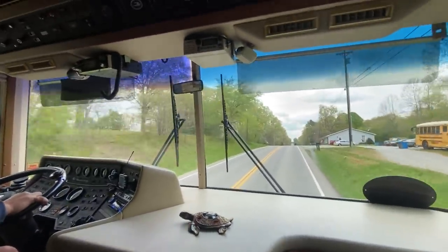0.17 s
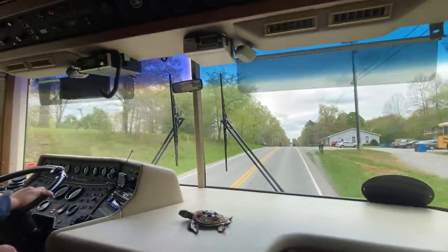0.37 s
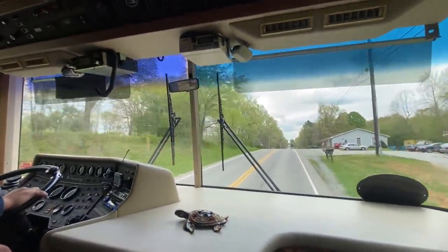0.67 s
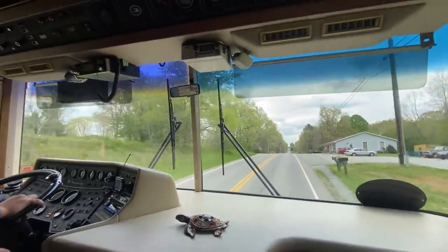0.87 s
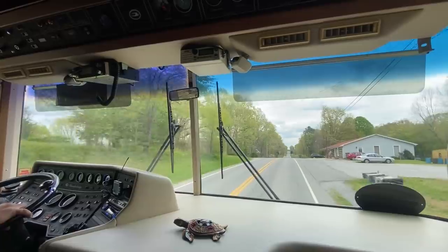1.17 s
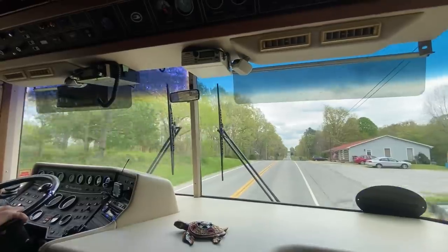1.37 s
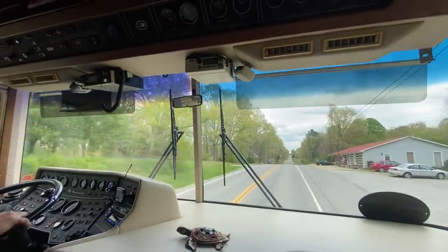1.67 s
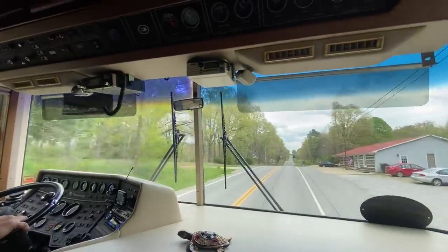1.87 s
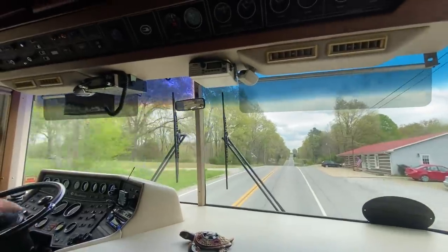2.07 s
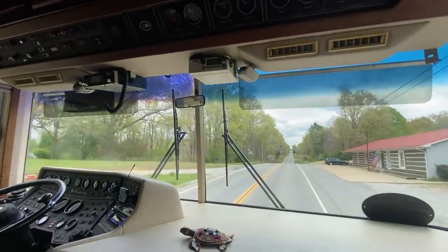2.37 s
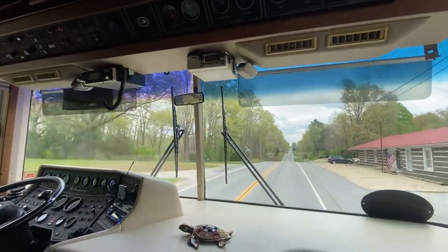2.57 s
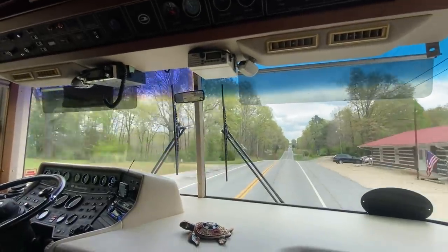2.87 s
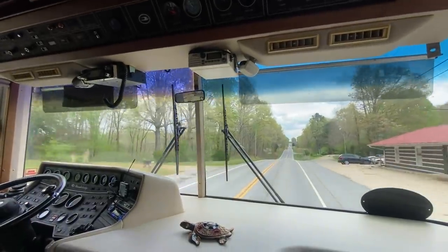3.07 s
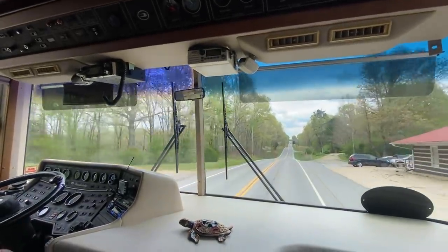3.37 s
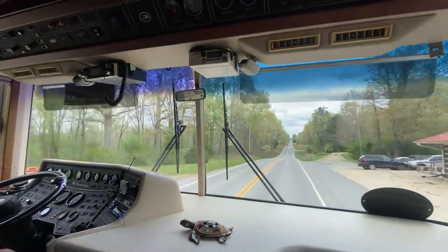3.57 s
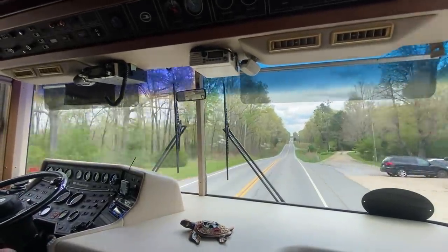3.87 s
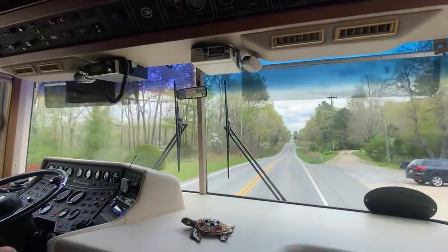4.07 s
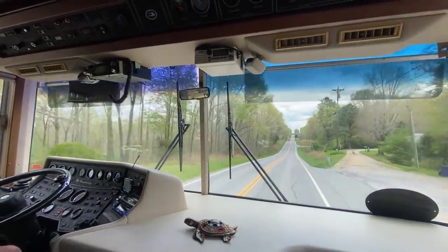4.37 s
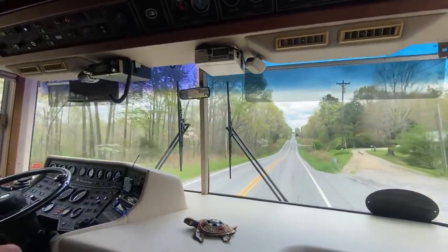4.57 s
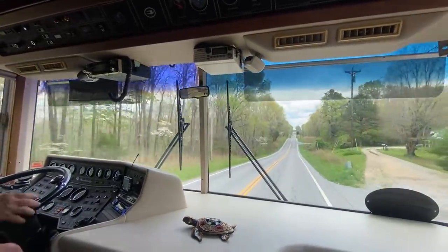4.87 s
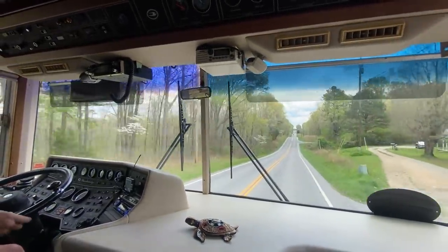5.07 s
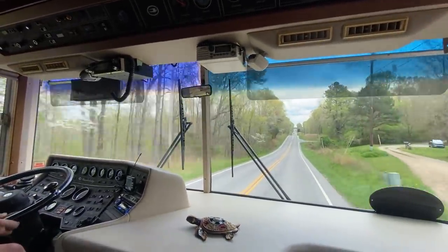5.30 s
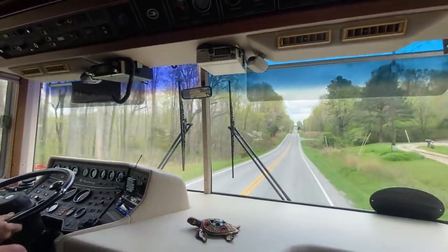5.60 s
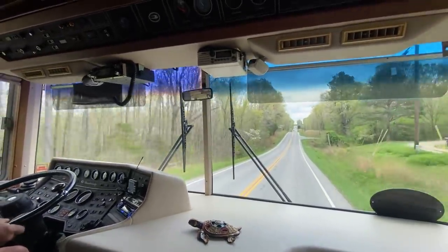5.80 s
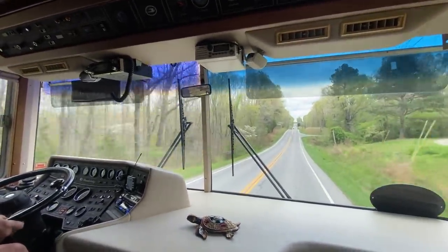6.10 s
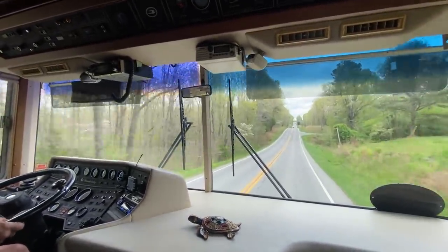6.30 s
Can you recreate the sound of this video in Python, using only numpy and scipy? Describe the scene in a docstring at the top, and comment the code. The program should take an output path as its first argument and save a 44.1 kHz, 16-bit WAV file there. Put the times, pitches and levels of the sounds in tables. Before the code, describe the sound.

Low engine hum, booming cabin air, tyre roar and soft wind heard from a bus dashboard, with plastic chatter and one rough-patch knock.

```python
"""Country road, from a diesel bus cab

Heard at the dashboard: a far-off engine drones at its firing rate, a sine locked to the crankshaft, with
weaker tones around it. A wandering sine is the cabin boom, swelled by jolts; shaped noise gives panel
rumble, tyre roar and wind. Close by, loose trim chatters in noise bursts, fittings tick as struck
resonances, plastic squeaks as short tones, and a rough patch knocks on the floor.
The microphone loses the deepest rumble and the recorder cuts the top."""
import sys
import numpy as np
from scipy import signal
from scipy.fft import rfft, irfft
from scipy.io import wavfile

SR = 44100
rng = np.random.default_rng(int(sys.argv[2]) if len(sys.argv) > 2 else 0)


def wav_record(signal):
    """Record a signal, one row per channel, as 16-bit PCM in the file named by sys.argv[1]."""
    frames = np.transpose(np.atleast_2d(signal))
    bounded = np.clip(frames, -1, 1)
    # unit amplitude maps onto the largest positive 16-bit level
    quanta = np.round(bounded * 32767).astype(np.int16)
    wavfile.write(sys.argv[1], SR, quanta)


N = 284004
TIME = np.arange(N) / SR

# Levels in the tables are relative: each source function sets its own final balance.
# crankshaft speed sags and recovers: time_s, turns_per_second_hz
CRANK_SPEED = [(0.0, 28.72), (1.8, 27.6), (2.5, 27.33), (3.6, 27.19), (4.5, 27.3), (5.5, 27.6),
               (6.44, 28.13)]
# engine load, as the level of the firing tone: time_s, level_db
ENGINE_LOAD = [(0.0, -29), (0.45, -28), (0.7, -22), (1.1, -20), (2.2, -21.5), (3.35, -24.5), (3.54, -29),
               (3.72, -19), (3.98, -26), (4.13, -24), (4.4, -27), (5.1, -22.5), (5.3, -28), (5.62, -27.5),
               (5.75, -28), (6.44, -21.5)]
# weaker engine tones: multiple_of_crank_speed, level_db
ENGINE_ORDERS = [(3, -31.5), (5, -35.5), (6, -41), (7, -45.5), (8, -44.5), (13, -48.5), (20, -53.5)]
# a higher engine tone swells and fades: time_s, level_db
HUM_LEVEL = [(0.0, -52), (0.6, -48), (0.72, -34.5), (1.35, -41.5), (1.51, -28.5), (1.63, -49),
             (1.98, -31.5), (2.3, -42), (2.65, -36), (2.8, -35.5), (3.1, -38.5), (3.6, -37.5), (4.1, -41.5),
             (4.9, -35), (5.55, -34), (6.44, -37)]
# whir of a belt-driven accessory: harmonic_number, level_db
ACCESSORY_HARMONICS = [(1, -44), (2, -57), (3, -55)]
# wandering pitch of the cabin boom: time_s, pitch_hz
BOOM_PITCH_PATH = [(0.0, 69.1), (.35, 64.5), (.8, 72.2), (1.3, 72.5), (1.8, 71.1), (2.1, 82), (2.33, 72),
                   (2.55, 72), (3.0, 67.5), (3.35, 69.3), (4.0, 66.3), (4.6, 66.25), (5.0, 73.2), (5.3, 66),
                   (5.6, 69.3), (6.0, 70.4), (6.3, 78.2), (6.44, 73)]
# the body jolts on uneven road: start_s, length_s, cabin_boom_db, panel_rumble_db
ROAD_JOLTS = [(0.0, 0.033, -29, -24), (0.144, 0.15, -26, -27), (.48, 0.68, -39, -32),
              (1.007, 0.086, -24, -49), (1.178, 0.18, -22.5, -48), (1.577, 0.086, -19.5, -42),
              (1.748, 0.14, -25, -30), (1.971, 0.22, -24.5, -34), (2.346, 0.18, -18, -33),
              (2.687, 0.16, -23, -42), (2.951, 0.12, -17, -33), (3.25, 0.14, -20, -26.5),
              (3.788, 0.047, -21, -24), (3.93, 0.19, -27, -38), (4.301, 0.084, -26.5, -28),
              (4.603, 0.11, -20.5, -27), (4.899, 0.066, -21, -34), (5.159, 0.11, -33, -28),
              (5.515, 0.075, -15, -33), (5.662, 0.12, -28, -21.5), (6.07, 0.06, -18.5, -36),
              (6.191, 0.26, -22.5, -25.5)]
# spectrum of the rumbling panels: frequency_hz, level_db
PANEL_SPECTRUM = [(24, -34), (30, -22), (42, -2.5), (55, 4), (92, 5), (125, 6), (150, -1), (180, 1.5),
                  (215, 1.5), (250, -3), (290, -5.5), (360, -14.5), (600, -34.5)]
# spectrum of the tyre roar: frequency_hz, level_db
TYRE_SPECTRUM = [(150, -32), (240, 0), (310, 4), (400, -1.5), (510, -2.5), (590, -7.5), (750, -9.5),
                 (1000, -12), (1500, -19), (3000, -29)]
# soft, dull knocks as the wheels cross a rough patch: start_s, level_db, brightness_hz
ROAD_KNOCKS = [(0.6, -14, 1200), (1.222, -13, 2500), (4.617, -7, 1397), (4.645, -16, 1802),
               (4.677, -7, 1403), (4.704, 5, 170), (5.383, -14, 2000), (5.493, -16, 2000),
               (6.213, -23, 2010)]
# resonances of the floor: frequency_hz, width_hz, level_db
FLOOR_MODES = [(141, 80, 6), (333, 280, 3), (465, 140, -4), (840, 240, -3.5), (1210, 440, -5.5),
               (1780, 1100, -10)]
# bursts of chatter from loose trim: start_s, level_db, length_s
TRIM_CHATTERS = [(.123, -44, 0.01), (.158, -46, 0.0036), (.184, -44, .005), (.194, -46, .005),
                 (.214, -45, .004), (.226, -48, .005), (.235, -46, .005), (.254, -44, .002),
                 (.261, -43, .002), (.271, -46, .011), (.294, -44, .007), (.378, -44, 0.0089),
                 (.396, -51, .002), (.581, -46, .018), (.608, -43.5, .008), (.638, -46, 0.02),
                 (.731, -45, .010), (1.087, -45, .005), (1.225, -42, 0.015), (1.342, -40.5, 0.014),
                 (1.362, -45, 0.0051), (1.610, -46, 0.0053), (1.656, -46, 0.014), (1.701, -45, .004),
                 (1.772, -48.5, .008), (1.802, -48, 0.0098), (1.874, -47, 0.011), (2.317, -48, .009),
                 (2.366, -46, .004), (2.378, -47, 0.0044), (2.389, -46, 0.0072), (2.522, -46, 0.0099),
                 (2.592, -46, .005), (2.684, -49, 0.013), (2.735, -51, 0.0092), (3.230, -44.5, 0.0027),
                 (3.597, -47.5, 0.0049), (3.618, -47.5, .004), (3.671, -45, 0.0038), (3.840, -44, 0.0094),
                 (3.856, -46, 0.0095), (3.888, -43, 0.0027), (3.908, -49, .003), (4.054, -49, .014),
                 (4.080, -44, 0.0031), (4.118, -49, 0.0039), (4.245, -40, 0.0029), (4.485, -46, 0.0039),
                 (4.494, -61, 0.0032), (4.582, -45, .003), (4.594, -45, .012), (4.610, -44, 0.0079),
                 (4.630, -45, 0.011), (4.653, -44, 0.023), (4.691, -47.5, 0.026), (4.728, -49.5, .028),
                 (4.856, -48, .011), (5.202, -48, 0.0093), (5.267, -44, 0.025), (5.370, -44.5, 0.029),
                 (5.411, -46, 0.0054), (5.436, -48, .008), (5.500, -47.5, 0.0051), (5.733, -44.5, .010),
                 (5.821, -46, 0.0076), (5.879, -45.5, .017), (5.914, -45, 0.0039), (6.205, -38, 0.0017),
                 (6.214, -46, .016), (6.261, -48, 0.0058), (6.272, -50, .004), (6.294, -47.5, .004),
                 (6.380, -47, .009)]
# spectrum of the trim contacts: frequency_hz, level_db
TRIM_SPECTRUM = [(800, -13), (2000, 8.5), (3500, 0.5), (5500, -2), (7200, 0), (9500, -3), (12000, -4),
                 (14200, -0.5), (15700, -6)]
# resonances of the loose trim: frequency_hz, width_hz, level_db
TRIM_RESONANCES = [(7100, 300, -8), (8330, 450, -8), (10000, 220, -1), (12400, 370, -13), (13600, 490, -7)]
# ticks of hard fittings: start_s, pitch_hz, level_db
FITTING_TICKS = [(0.775, 1720, -28), (1.285, 1295, -24), (2.37, 3000, -25), (2.519, 2850, -23),
                 (2.684, 1950, -23), (2.704, 2150, -24), (2.734, 2850, -24.5), (2.805, 2950, -21),
                 (2.881, 2886, -28), (3.468, 3000, -25), (3.623, 2846, -29), (4.725, 2880, -26),
                 (4.803, 2950, -25), (4.878, 3010, -25.5), (5.385, 1967, -25), (5.409, 1740, -24),
                 (5.487, 2900, -25.5), (5.68, 2100, -27), (6.216, 2800, -22.5), (6.27, 2400, -24),
                 (6.29, 2950, -22)]
# clinks of a small metal part: start_s, level_db
METAL_CLINKS = [(4.63, -22)]
# squeaks of rubbing trim: start_s, pitch_hz, level_db, length_s
TRIM_SQUEAKS = [(2.41, 5400, -50, .025), (2.49, 5440, -52, 0.045), (2.795, 5390, -49, 0.045),
                (3.17, 5380, -44, 0.049), (3.336, 5300, -41.5, 0.06), (4.21, 5380, -50, 0.039),
                (4.374, 5330, -46, 0.029), (5.452, 5300, -48, 0.029), (5.533, 5300, -46.5, .035),
                (6.222, 5415, -48, 0.047)]
# airflow along the body eases and builds: time_s, level_db
AIRFLOW_LEVEL = [(0.0, -37.5), (1.9, -41), (2.4, -38.5), (3.15, -42), (3.8, -40), (4.6, -39), (6.44, -38)]
# spectrum of the wind: frequency_hz, level_db
WIND_SPECTRUM = [(500, 1.5), (1100, -1.5), (1650, 2.5), (2500, 0), (3500, -0.5), (5000, -3.5), (6000, -10),
                 (7300, -19.5), (9500, -19), (11500, -17), (13700, -14), (15500, -21)]
# gaps and panels that ring in the airflow: frequency_hz, width_hz, level_db
GAP_MODES = [(1117, 21, 5), (1497, 42, -7), (1710, 60, -12), (2860, 36, -16), (3150, 69, -6),
             (3750, 390, -10), (7200, 250, -4), (10800, 170, -4), (12250, 130, -5), (13650, 200, -6),
             (14270, 120, -6)]

FIRINGS_PER_TURN, HUM_ORDER, ACCESSORY_RATIO = 4, 10, 7.567  # multiples of the crank speed
FIRING_THROB_DB, FIRING_WOBBLE_RAD = 1.2, .1
HUM_THROB_DB, HUM_WOBBLE_RAD = 3, .5
BOOM_WOBBLE_RAD, BOOM_WOBBLE_HZ = .35, 7
CRUISE_HZ = 27.5  # crank speed at which the road speed counts as 1
JOLT_ATTACK_S, JOLT_RELEASE_S = .022, .05
KNOCK_ATTACK_S, KNOCK_DECAY_S = .004, .012
CHATTER_ATTACK_S, CHATTER_TAIL_S = .0002, .0033
STIRS_PER_S, STIR_DB, STIR_SPREAD_DB, STIR_LENGTH_S = 15, -54, 3, .003  # faint, at random moments
TICK_DECAY_S, TICK_BOUNCE_DB = .009, 4
SQUEAK_SAG = .016  # fraction of its pitch that a squeak falls by
SQUEAK_JITTER, SQUEAK_JITTER_HZ = .014, 900  # fraction of the pitch, rate
TOP_HZ = 15650


def undb(db):
    """Decibels to gain."""
    return 10 ** (np.asarray(db) / 20)


def unit(x):
    """Scale to rms 1."""
    return x / np.sqrt(np.mean(x ** 2))


def curves(table):
    """Each column of a table, joined by straight lines in time."""
    s, *columns = np.transpose(table)
    return [np.interp(TIME, s, column) for column in columns]


def walk(rate_hz):
    """Smooth random wandering, rms 1, faster for a higher rate."""
    f = np.arange(N // 2 + 1) * SR / N
    spectrum = rfft(rng.standard_normal(N)) * np.exp(-(f / rate_hz) ** 2)
    return unit(irfft(spectrum, N))


def colour(x, points):
    """Shape a sound by a spectrum of (Hz, dB) points, falling away beyond both ends; rms 1."""
    hz, db = np.transpose(points)
    f = np.arange(N // 2 + 1) * SR / N + 1  # 1 Hz up, to keep the logarithm finite
    gain = undb(np.interp(np.log(f), np.log(hz), db))
    gain = gain / (1 + (hz[0] / 2 / f) ** 2) / (1 + (f / hz[-1] / 2) ** 2)
    return unit(irfft(rfft(x) * gain, N))


def ring(x, hz, width_hz):
    """One resonance, gain 1 at its centre."""
    return signal.lfilter(*signal.iirpeak(hz, hz / width_hz, fs=SR), x)


def add(track, s, sound):
    """Mix a sound in at a time."""
    start = max(int(s * SR), 0)
    part = sound[:max(N - start, 0)]
    track[start:start + len(part)] += part


def burst(length_s, attack_s, release_s):
    """An envelope that rises, holds until a length has passed and dies away."""
    t = TIME[:SR]
    return (1 - np.exp(-t / attack_s)) * np.exp(-np.maximum(t - length_s, 0) / release_s)


def blows(table, decay_s):
    """Rough contacts: noise that starts abruptly and dies away, one per (s, dB) row."""
    force, t = np.zeros(N), TIME[:SR // 4]
    for s, db in table:
        add(force, s, undb(db) * np.exp(-t / decay_s))
    return force * rng.standard_normal(N)


def engine(crank_hz, hum_db=-1.37, waver_db=2.0, wobble_rad=0.35):
    """The firing tone follows the load; unequal cylinders and an accessory add weaker, wavering tones."""
    angle = 2 * np.pi * np.cumsum(crank_hz) / SR
    firing_gain = undb(curves(ENGINE_LOAD)[0] + FIRING_THROB_DB * walk(6))
    firing = firing_gain * np.sin(FIRINGS_PER_TURN * angle + FIRING_WOBBLE_RAD * walk(5))
    hum_gain = undb(curves(HUM_LEVEL)[0] + hum_db + HUM_THROB_DB * walk(9.2))
    hum = hum_gain * np.sin(HUM_ORDER * angle + HUM_WOBBLE_RAD * walk(6.2))
    whir = [(harmonic * ACCESSORY_RATIO, db) for harmonic, db in ACCESSORY_HARMONICS]
    others = 0
    for order, db in list(ENGINE_ORDERS) + whir:
        phase = order * angle + wobble_rad * walk(3.5) + 2 * np.pi * rng.random()
        others = others + undb(db + waver_db * walk(0.96)) * np.sin(phase)
    return np.sqrt(2) * (firing + hum + others)


def jolts():
    """How hard the jolts drive the cabin air and the panels; each swells, holds and dies away."""
    boom, heave = np.zeros(N), np.zeros(N)
    for s, length_s, boom_db, rumble_db in ROAD_JOLTS:
        swell = burst(length_s, JOLT_ATTACK_S, JOLT_RELEASE_S)
        add(boom, s, undb(boom_db) * swell)
        add(heave, s, undb(rumble_db) * swell)
    return boom, heave


def cabin_boom(jolt, jolt_db=-1.5, steady_db=-33, waver_db=4.0):
    """The road keeps the cabin air booming on one wandering note; each jolt swells it."""
    hz, = curves(BOOM_PITCH_PATH)
    phase = 2 * np.pi * (np.cumsum(hz) / SR + rng.random())
    phase = phase + BOOM_WOBBLE_RAD * walk(BOOM_WOBBLE_HZ)
    steady = undb(steady_db + waver_db * walk(7.3))
    return np.sqrt(2) * np.sin(phase) * np.hypot(undb(jolt_db) * jolt, steady)


def road(speed, heave, rumble_db=-27.0, roar_db=-35, rumble_power=3, patchy_db=0.75, grit_db=2):
    """Panels rumble and tyres roar on the asphalt grain, louder with speed; jolts shake the panels harder."""
    rumble_gain = np.hypot(undb(rumble_db) * speed ** rumble_power, heave)
    panels = colour(rng.standard_normal(N), PANEL_SPECTRUM) * rumble_gain
    grit = rng.standard_normal(N) * undb(grit_db * walk(270))
    tyres = colour(grit, TYRE_SPECTRUM) * undb(roar_db) * speed
    return (panels + tyres) * undb(patchy_db * walk(2.0))


def bumps(bump_db=5):
    """A rough patch knocks on the floor: short noise pushes, softened by the tyres, ring its resonances."""
    force, push = np.zeros(N), burst(0, KNOCK_ATTACK_S, KNOCK_DECAY_S)
    for s, db, brightness_hz in ROAD_KNOCKS:
        rough = push * rng.standard_normal(len(push))
        dull = signal.lfilter(*signal.butter(2, brightness_hz, fs=SR), rough)
        add(force, s, undb(db) * dull)
    # each resonance is passed twice, for steeper sides
    floor = sum(undb(db) * ring(ring(force, hz, width), hz, width) for hz, width, db in FLOOR_MODES)
    return undb(bump_db) * floor


def chatter(loud_db=3.5, faint_db=-61, faint_spread_db=4):
    """Loose trim buzzes in short, abrupt bursts of contact noise, and stirs faintly in between."""
    contacts = colour(rng.standard_normal(N), TRIM_SPECTRUM)
    ringing = sum(undb(db) * ring(contacts, hz, width) for hz, width, db in TRIM_RESONANCES)
    contacts = unit(contacts + ringing)
    tremble = undb(faint_db) * unit(undb(2 * faint_spread_db * np.tanh(walk(45) / 2)))
    stirs = [(when * N / SR, STIR_DB + STIR_SPREAD_DB * (2 * size - 1), STIR_LENGTH_S)
             for when, size in rng.random((int(STIRS_PER_S * N / SR), 2))]
    energy = np.zeros(N)  # overlapping bursts add as power
    for s, db, length_s in list(TRIM_CHATTERS) + stirs:
        envelope = undb(db + loud_db) * burst(length_s, CHATTER_ATTACK_S, CHATTER_TAIL_S)
        add(energy, s, envelope ** 2)
    return contacts * np.sqrt(energy + tremble ** 2)


def ticks(width_hz=720, tick_db=4.0, crack_db=-14):
    """Hard fittings tap and bounce raggedly, each with a dull crack and a brief ring at its own pitch."""
    out, bounce = 0, unit(undb(2 * TICK_BOUNCE_DB * np.tanh(walk(260))))
    for s, hz, db in FITTING_TICKS:
        force = blows([(s, db)], TICK_DECAY_S) * bounce
        tone = ring(ring(force, hz, width_hz), hz, width_hz)
        crack = ring(force, hz, hz)  # as wide as its pitch
        out = out + tone + undb(crack_db) * crack
    return undb(tick_db) * out


def clink(hz=8500, width_hz=450, clink_db=2):
    """A small metal part clinks: a brief rough blow rings one high resonance."""
    force = blows(METAL_CLINKS, decay_s=0.0039)
    return undb(clink_db) * ring(ring(force, hz, width_hz), hz, width_hz)


def squeaks(octave_db=-4, catch_db=3):
    """Plastic rubs on plastic: a thin, scratchy, sagging tone with its octave, catching and slipping."""
    out, unsteady = np.zeros(N), walk(SQUEAK_JITTER_HZ)
    grip = unit(undb(catch_db * walk(90)))
    for s, hz, db, length_s in TRIM_SQUEAKS:
        u = np.linspace(0, 1, int(length_s * SR))
        jitter = SQUEAK_JITTER * unsteady[int(s * SR):][:len(u)]
        pitch_hz = hz * (1 + SQUEAK_SAG * (.5 - u) + jitter)
        phase = 2 * np.pi * np.cumsum(pitch_hz) / SR
        tone = np.sin(phase) + undb(octave_db) * np.sin(2 * phase)
        add(out, s, undb(db) * np.sin(np.pi * u) * tone)
    return out * grip


def wind(wind_db=0.57, flutter_db=1.0, grain_db=1.0):
    """Air rushes round the windscreen as shaped noise, flutters a little and rings in the gaps."""
    air_db, = curves(AIRFLOW_LEVEL)
    rush = colour(rng.standard_normal(N) * undb(grain_db * walk(610)), WIND_SPECTRUM)
    rush = rush + sum(undb(db) * ring(rush, hz, width) for hz, width, db in GAP_MODES)
    return unit(rush) * undb(air_db + wind_db + flutter_db * walk(29))


def scene():
    """Everything as it reaches the dashboard; in one gear the road speed follows the crankshaft."""
    crank_hz, = curves(CRANK_SPEED)
    boom, heave = jolts()
    drone = engine(crank_hz) + cabin_boom(boom) + road(crank_hz / CRUISE_HZ, heave)
    rattles = bumps() + chatter() + ticks() + clink() + squeaks()
    return (drone + rattles + wind())[None]


def record(dry):
    """The microphone drops the deepest rumble and the recorder cuts the top."""
    lean = signal.sosfilt(signal.butter(4, 29, "high", fs=SR, output="sos"), dry)
    return signal.sosfilt(signal.ellip(10, .2, 80, TOP_HZ, fs=SR, output="sos"), lean)


dry = scene()
out = record(dry)
wav_record(out)
```